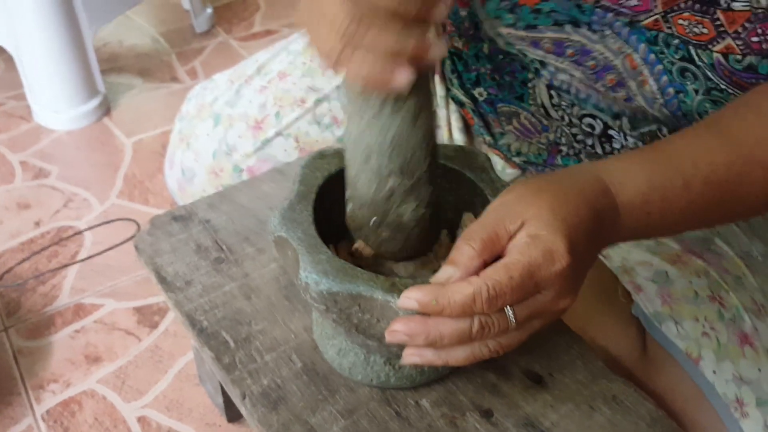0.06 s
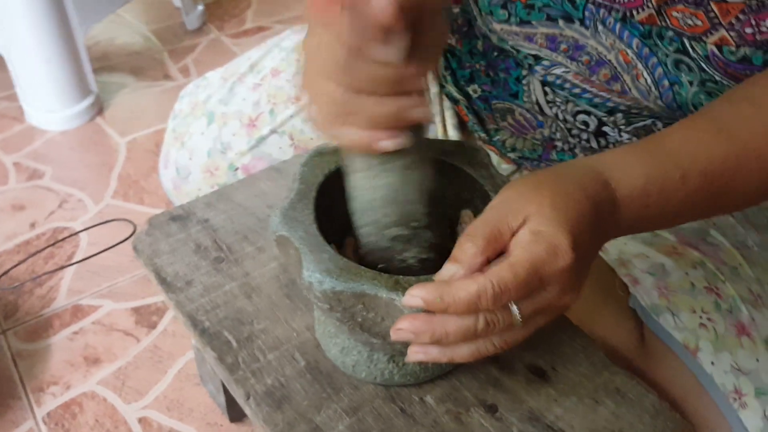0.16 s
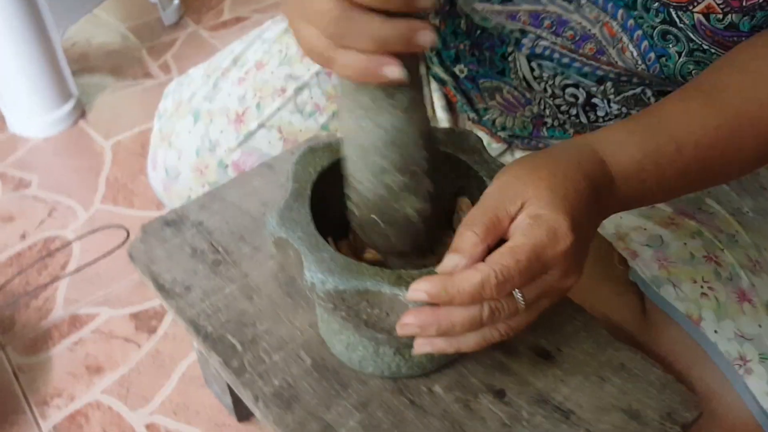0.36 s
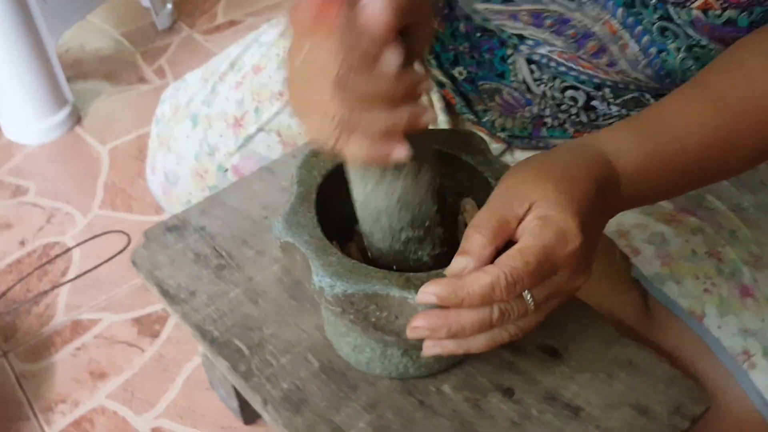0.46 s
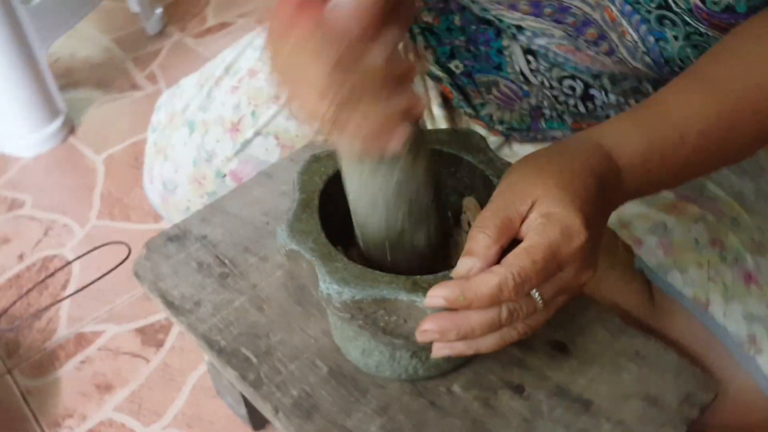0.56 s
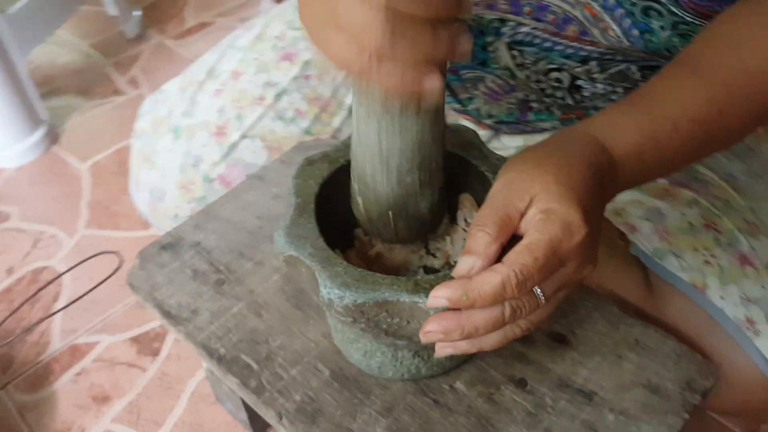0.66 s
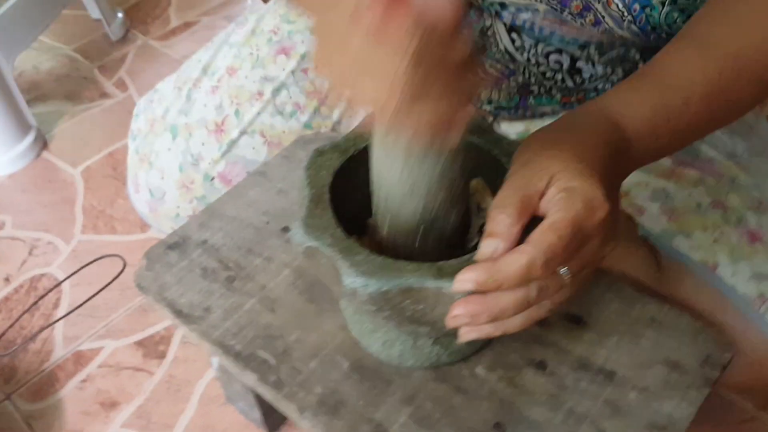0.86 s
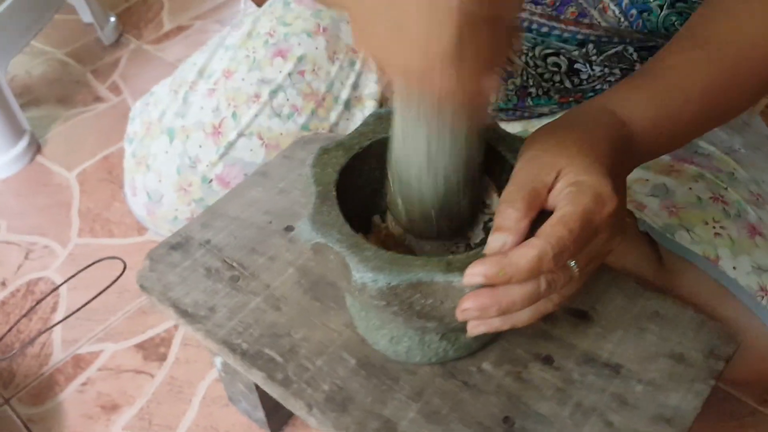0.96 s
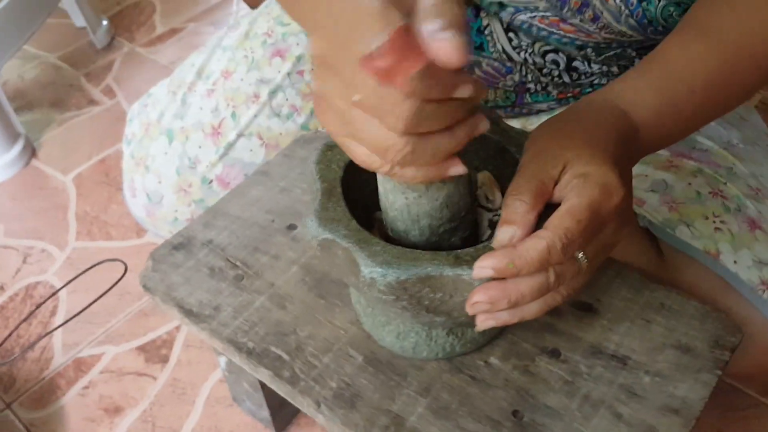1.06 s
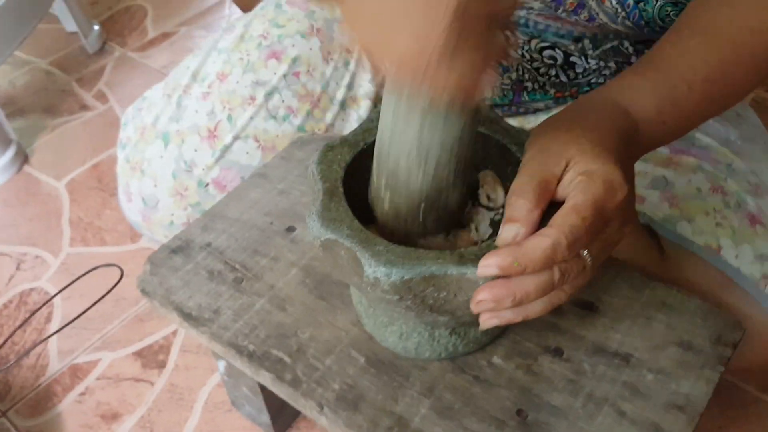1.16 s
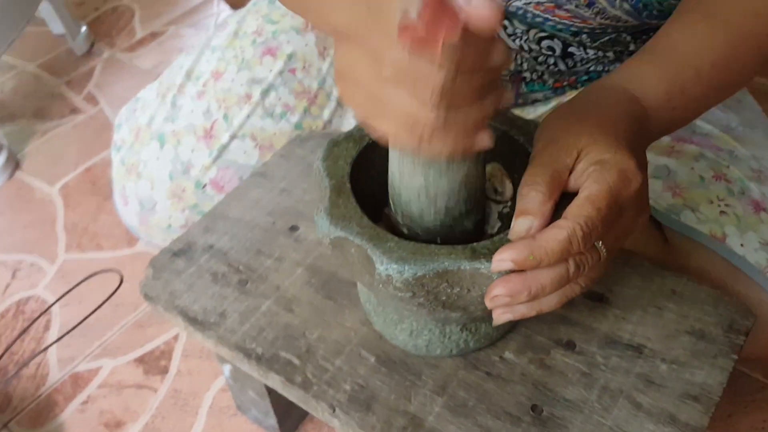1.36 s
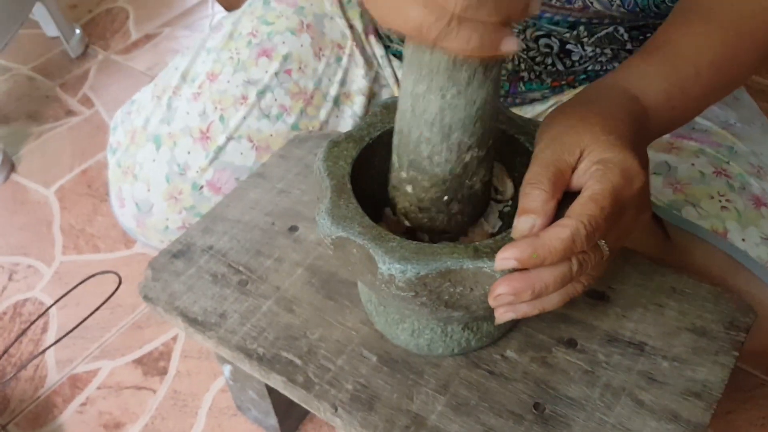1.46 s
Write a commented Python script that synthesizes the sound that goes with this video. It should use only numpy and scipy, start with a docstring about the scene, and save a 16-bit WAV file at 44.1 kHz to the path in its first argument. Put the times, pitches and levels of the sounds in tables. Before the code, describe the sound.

Steady mortar and pestle pounding, hard stony knocks and softer crunching strokes in a tiled kitchen

```python
"""Stone pestle pounding food in a stone mortar on a low wooden table, about 3.6 strokes/s, over a quiet hush.
Opens on the tail of a stroke. Bare hits near 0.21 and 1.05 s clack, ring and thud; a light graze ticks at 0.36 s.
Cushioned strokes near 0.49, 0.76-0.79 and 1.33 s are duller; noise bursts crunch the food around the strokes.
Thud, ring: damped sines. Clack: coloured pulse plus stone modes. A tiled kitchen answers with echoes, modes and
noise tails; the hardest blows overload the close microphone."""
import sys
import numpy as np
from scipy import signal
from scipy.fft import rfft, irfft, next_fast_len
from scipy.io import wavfile
from scipy.ndimage import uniform_filter1d

SR = 44100
rng = np.random.default_rng(int(sys.argv[2]) if len(sys.argv) > 2 else 0)


def waveform_to_disk(signal):
    """Save audio, clipped to [-1, 1], as 16-bit WAV at the path in sys.argv[1]."""
    frames = np.transpose(np.atleast_2d(signal))
    scaled = np.clip(frames, -1, 1) * 32767
    samples = np.round(scaled).astype(np.int16)
    wavfile.write(sys.argv[1], SR, samples)


N = 66150  # samples
CONTACT_LIFE_S = .75

# quiet background spectrum: freq_hz, level_db
HUSH_SPECTRUM = [(20, 0.5), (50, 0), (95, 6), (170, 2.5), (280, -14), (430, -6.5), (1000, -23), (2000, -25),
                 (4000, -34.5), (5200, -30), (6050, -22), (7100, -36.5), (9200, -28), (10500, -40.5),
                 (16000, -50)]
HUSH_RMS_DB = -56
# left-right correlation of diffuse sound: freq_hz, correlation
STEREO_CORRELATION = [(100, .98), (330, .97), (600, .85), (1200, .55), (3000, .45), (10000, .3)]

# pestle strokes: start_s, room_db, thud_db, thud_hz, thud_rise_s, clack_db, brightness_hz, ring_db
STROKES = [(-.052, -0.5, 0.5, 259, .001, 3.5, 3060, -14), (0.2084, 2.5, -4, 335, 0.0011, 2, 3350, -6),
           (0.4864, 0.5, -8.5, 349, 0.0005, -10, 1238, -60),
           (0.7632, -8, -24, 330, .001, -35.5, 864, -41.5), (0.79, -4, -7, 429, 0.0014, -9.5, 759, -65.5),
           (1.048, 3, -6.5, 361, 0.0017, -1.5, 3560, -17.5),
           (1.326, -5.5, -15, 297, 0.00102, -21.5, 1120, -64)]
# dead clack of stone on stone: freq_hz, level_db
CLACK_SPECTRUM = [(30, -19), (100, -0.5), (300, 10.5), (600, 15.5), (900, 22), (1500, 20.5), (2300, 24),
                  (3200, 15.5), (4000, 8), (6000, 15), (16000, 3.5)]
# mortar and pestle modes, damped by hands and food: freq_hz, level_db, t60_s
STONE_MODES = [(557, -28, 0.047), (1104, -17.5, 0.018), (2200, -17, .013)]
THUD_T60_S = 0.014
RING_HZ, RING_T60_S = 4860, .029
BOWL_SPREAD_HZ = 1382  # all-pass corner

# food being crushed: start_s, rise_s, hold_s, level_db, tilt_db_per_octave
CRUNCHES = [(-.045, 0.00046, 0.0089, -20, -3.5), (0.2066, .0003, 0.0016, -8, -4),
            (0.4844, .0005, 0.001, -19.5, -3), (0.7555, 0.0043, 0.0038, -42, -0.5),
            (0.7669, 0.002, .003, -47, -1.5), (.772, 0.0033, 0.012, -36, -1),
            (1.0496, 0.000242, 0.00013, -23.5, 1), (1.3202, 0.0025, .002, -26.5, -2.5),
            (1.3227, .001, .005, -41, -3.5)]
# crunch colour before tilt: freq_hz, level_db
CRUNCH_SPECTRUM = [(200, -5), (1200, -6), (2500, -7.5), (4200, 0.5), (6000, -3), (9000, 3.5), (10500, -4),
                   (12500, -2.5), (16000, -4)]
GRAIN_SPREAD_DB = 5

# pestle grazing the wall as it lifts: start_s, level_db
GRAZES = [(.3574, -21)]
GRAZE_HZ, GRAZE_T60_S = 1000, .0035

# echoes off nearby surfaces: delay_s, level_db
WALLS = [(.0032, -28), (0.012, -26.5), (0.0133, -13.5), (0.019, -19.5), (.0245, -28.5), (.0272, -20)]
WALL_SPREAD_S = .0002
# kitchen standing waves: freq_hz, level_db
ROOM_MODES = [(103, -40), (185, -44.5), (284, -57), (298, -55), (364, -52.5), (432, -53), (485, -55),
              (546, -59.5), (566, -53.5), (590, -52.5), (662, -55), (880, -57), (916, -56), (986, -57)]
# standing-wave decay: freq_hz, t60_s
MODE_T60 = [(100, 0.28), (200, 0.26), (400, .22), (1000, 0.16)]
# diffuse tail decay: freq_hz, t60_s
ROOM_T60 = [(100, 0.16), (300, .2), (600, 0.15), (2000, 0.23), (5000, 0.16), (9000, 0.32), (15000, 0.17)]
# diffuse tail colour: freq_hz, level_db
ROOM_COLOUR = [(40, -1.5), (100, 11), (250, -4.5), (600, 3), (850, 2.5), (1200, -7.5), (2400, -6.5),
               (5000, -9), (9000, -14), (15000, -9.5)]
ROOM_DB, ROOM_ONSET_S = -32.5, .011
LATE_DB, LATE_T60_S = -15.5, 0.63  # slow part, relative to the main tail
# early diffuse colour: freq_hz, level_db
EARLY_COLOUR = [(50, -11), (150, -9.5), (300, -2), (600, 6), (1200, -5.5), (2500, -7), (5000, -13.5),
                (10000, -8), (16000, -13.5)]
EARLY_DB, EARLY_T60_S, EARLY_ONSET_S = -29.5, .05, 0.0075
BASS_CUT_HZ = 141

# channel balance of the contacts: freq_hz, left_over_right_db
BALANCE = [(100, 3), (500, 0.3), (1100, 3.5), (2200, 2), (4500, 0), (8000, -3.34), (13000, -3.5)]
LEFT_LEAD_S, PORT_DB = .000018, -8.5
CLIP_TOP, LOW_CUT_HZ, TOP_HZ = 1.0, 47, 15600


def amp(db):
    """Decibels to gain."""
    return 10 ** (np.asarray(db) / 20)


def unit(x):
    """Scale to rms 1."""
    return x / np.sqrt(np.mean(x ** 2) + 1e-20)


def along(points, hz):
    """Interpolate (Hz, value) points on a log-frequency axis."""
    point_hz, value = np.transpose(points)
    return np.interp(np.log(hz + 1), np.log(point_hz + 1), value)


def clock():
    """Seconds since a contact."""
    return np.arange(int(CONTACT_LIFE_S * SR)) / SR


def fade(t, t60_s):
    """Exponential decay: 60 dB per t60."""
    return np.exp(-np.log(1000) * t / t60_s)


def filtered(x, response):
    """Multiply the spectrum of x by a response of frequency."""
    n = x.shape[-1]
    padded = next_fast_len(n + 8192)
    hz = np.fft.rfftfreq(padded, 1 / SR)
    return irfft(rfft(x, padded) * response(hz), padded)[..., :n]


def softened(x, corner_hz, order=2):
    """Low-pass: a soft contact or surface loses the treble."""
    sos = signal.butter(order, min(corner_hz, SR / 2 - 1), fs=SR, output="sos")
    return signal.sosfilt(sos, x)


def high_passed(x, corner_hz, order):
    """Butterworth bass cut."""
    return signal.sosfilt(signal.butter(order, corner_hz, "high", fs=SR, output="sos"), x)


def add(out, start_s, sound):
    """Mix in a sound; a negative start drops its beginning."""
    i = round(start_s * SR)
    part = sound[:, max(-i, 0):N - i]
    out[:, max(i, 0):max(i, 0) + part.shape[1]] += part


def diffuse(spectrum, size):
    """Stereo noise from all around: mid/side shares set the correlation, high in bass, low in treble."""
    def mid_side_gain(hz):
        angle = np.arccos(np.clip(along(STEREO_CORRELATION, hz), -1, 1)) / 2
        return amp(along(spectrum, hz)) * [np.cos(angle), np.sin(angle)]
    mid, side = filtered(rng.standard_normal((2, size)), mid_side_gain)
    return np.array([mid + side, mid - side])


def hush():
    """Steady coloured diffuse noise."""
    return amp(HUSH_RMS_DB) * unit(diffuse(HUSH_SPECTRUM, size=N))


def impulse(spectrum):
    """Sharp causal pulse: minimum phase by folding the cepstrum."""
    n = len(clock())
    hz = np.fft.rfftfreq(n, 1 / SR)
    cepstrum = irfft(np.log(amp(along(spectrum, hz))), n)
    cepstrum[1:n // 2] *= 2
    cepstrum[n // 2:] = 0
    return irfft(np.exp(rfft(cepstrum)), n)


def table_thud(thud_hz, rise_s):
    """Table under the mortar: a damped sine with a soft rise."""
    t = clock()
    return np.sin(2 * np.pi * thud_hz * t) * fade(t, THUD_T60_S) * (1 - np.exp(-t / rise_s))


def stone_clack(brightness_hz):
    """Pulse plus stone modes, spread in time by the bowl (all-pass) and dulled by food (low-pass)."""
    t = clock()
    clack = impulse(CLACK_SPECTRUM)
    for hz, db, t60_s in STONE_MODES:
        clack = clack + amp(db) * np.cos(2 * np.pi * hz * t) * fade(t, t60_s)
    spread = filtered(clack, lambda hz: ((BOWL_SPREAD_HZ - 1j * hz) / (BOWL_SPREAD_HZ + 1j * hz)) ** 4)
    return softened(spread, brightness_hz, order=4)


def stone_ring():
    """Bare stone rings as one damped sine."""
    t = clock()
    return np.sin(2 * np.pi * RING_HZ * t) * fade(t, RING_T60_S)


def stroke(thud_db, thud_hz, rise_s, clack_db, brightness_hz, ring_db):
    """One blow excites table, stone contact and stone ring together."""
    thud = amp(thud_db) * table_thud(thud_hz, rise_s)
    clack = amp(clack_db) * stone_clack(brightness_hz)
    return thud + clack + amp(ring_db) * stone_ring()


def crunch(rise_s, hold_s, level_db, tilt_db_per_octave, release_t60_s=.008):
    """Fibres burst in a quick cluster of tiny cracks: noise with an uneven level."""
    t = clock()
    noise = rng.standard_normal(len(t))
    unevenness = unit(uniform_filter1d(rng.standard_normal(len(t)), size=12))
    cracks = noise * amp(GRAIN_SPREAD_DB * unevenness)

    def colour(hz):
        return amp(along(CRUNCH_SPECTRUM, hz) + tilt_db_per_octave * np.log2(hz + 1))
    fizz = unit(filtered(cracks, colour))
    envelope = np.minimum(t / rise_s, 1) * fade(np.maximum(t - rise_s - hold_s, 0), release_t60_s)
    return amp(level_db) * fizz * envelope


def graze(level_db):
    """Light dry tick of stone on stone: a single damped swing."""
    t = clock()
    swing = np.cos(2 * np.pi * GRAZE_HZ * t) * fade(t, GRAZE_T60_S)
    return amp(level_db) * softened(swing, corner_hz=6020)


def ports(x, scatter_t60_s=.004):
    """Direct sound reaches the left port first; its treble scatters differently at each."""
    t = clock()
    scatter = rng.standard_normal(len(t)) * fade(t, scatter_t60_s)
    scatter = amp(PORT_DB) * scatter / np.linalg.norm(scatter)
    side = signal.fftconvolve(x, scatter)[:len(t)]
    side = side - softened(side, corner_hz=1200, order=1)  # treble only
    sign = np.array([[1], [-1]])
    direct = filtered(x, lambda hz: np.exp(1j * np.pi * hz * LEFT_LEAD_S * sign))
    return direct + sign * side


def diffuse_tail():
    """Noise decaying at two rates, the faster one set per frequency."""
    size = len(clock())
    hz, age_s, bins = signal.stft(diffuse(ROOM_COLOUR, size=size), SR, nperseg=256)
    decay = fade(age_s, along(ROOM_T60, hz)[:, None]) + amp(LATE_DB) * fade(age_s, LATE_T60_S)
    return signal.istft(bins * decay, SR, nperseg=256)[1][:, :size]


def wall_echoes():
    """Nearby surfaces return softened copies, slightly apart in time left and right."""
    echoes = np.zeros((2, len(clock())))
    for delay_s, db in WALLS:
        arrival_s = delay_s + WALL_SPREAD_S * rng.uniform(-.5, .5, 2)
        echoes[[0, 1], np.round(arrival_s * SR).astype(int)] += amp(db)
    return softened(echoes, corner_hz=5000)


def room_answer():
    """Kitchen impulse response: diffuse tail, early diffuse sound, standing waves, echoes."""
    t = clock()
    since_s = np.maximum(t - ROOM_ONSET_S, 0)
    answer = amp(ROOM_DB) * diffuse_tail() * (since_s > 0)
    early_envelope = fade(since_s, EARLY_T60_S) * np.minimum(t / EARLY_ONSET_S, 1) ** 2
    answer += amp(EARLY_DB) * diffuse(EARLY_COLOUR, size=len(t)) * early_envelope
    for k, (hz, db) in enumerate(ROOM_MODES):
        mode = np.sin(2 * np.pi * hz * since_s) * fade(since_s, along(MODE_T60, hz))
        answer += (-1) ** k * amp(db) * mode  # alternating polarity
    return answer + wall_echoes()


def kitchen(contact, room_db):
    """A small object radiates little bass; heard direct plus the room's answer."""
    x = high_passed(contact, BASS_CUT_HZ, order=3)
    room = signal.fftconvolve(x[None], room_answer(), axes=1)[:, :len(x)]
    return ports(x) + amp(room_db) * room


def scene():
    """All contacts in the kitchen, balanced left to right, over the hush."""
    out = np.zeros((2, N))
    for start_s, room_db, *blow in STROKES:
        add(out, start_s, kitchen(stroke(*blow), room_db))
    for start_s, *burst in CRUNCHES:
        add(out, start_s, kitchen(crunch(*burst), room_db=0.0))
    for start_s, level_db in GRAZES:
        add(out, start_s, kitchen(graze(level_db), room_db=-17))
    half = np.array([[.5], [-.5]])
    return filtered(out, lambda hz: amp(along(BALANCE, hz) * half)) + hush()


def record(dry):
    """Microphone: flattens the highest peaks, cuts deep bass, drops everything above its band limit."""
    clipped = dry / (1 + np.abs(dry / CLIP_TOP) ** 6) ** (1 / 6)
    lean = high_passed(clipped, LOW_CUT_HZ, order=2)
    return filtered(lean, lambda hz: 1 / np.sqrt(1 + (hz / TOP_HZ) ** 120))


dry = scene()
out = record(dry)
waveform_to_disk(out)
```